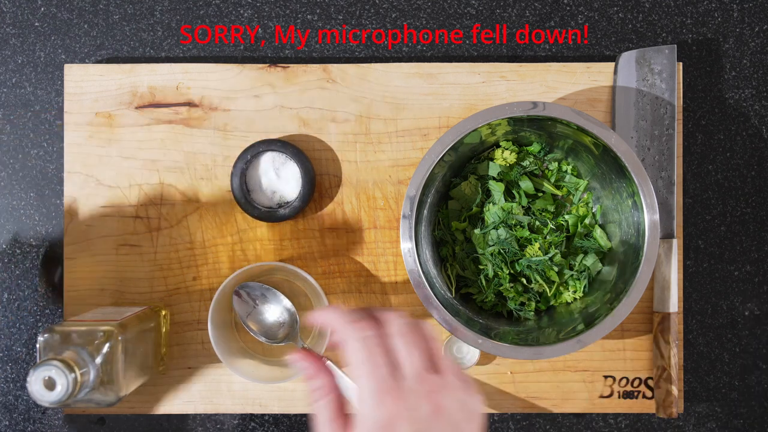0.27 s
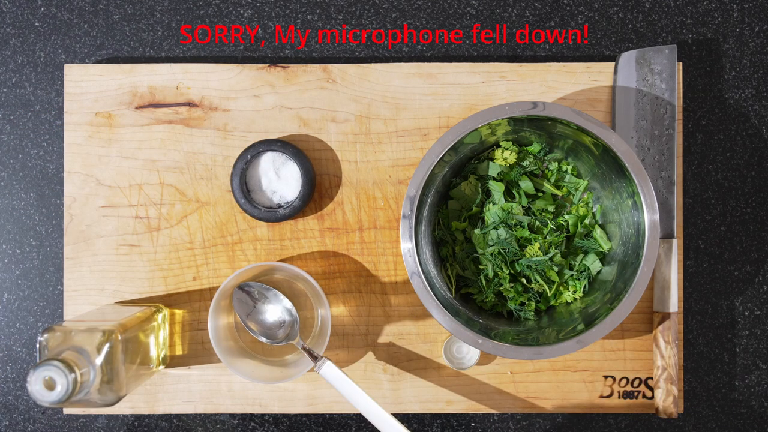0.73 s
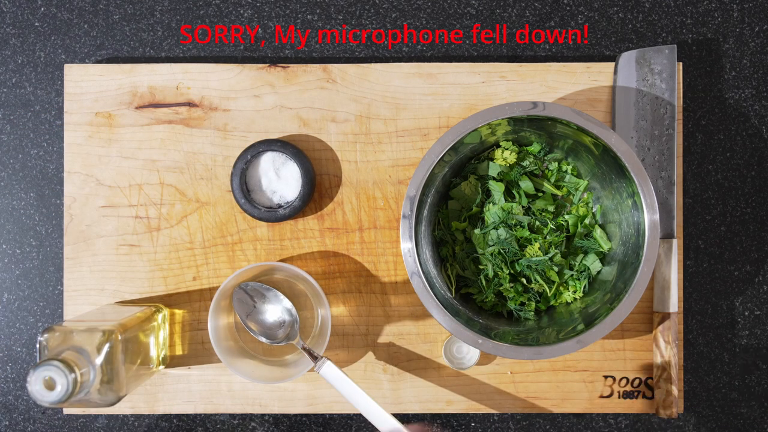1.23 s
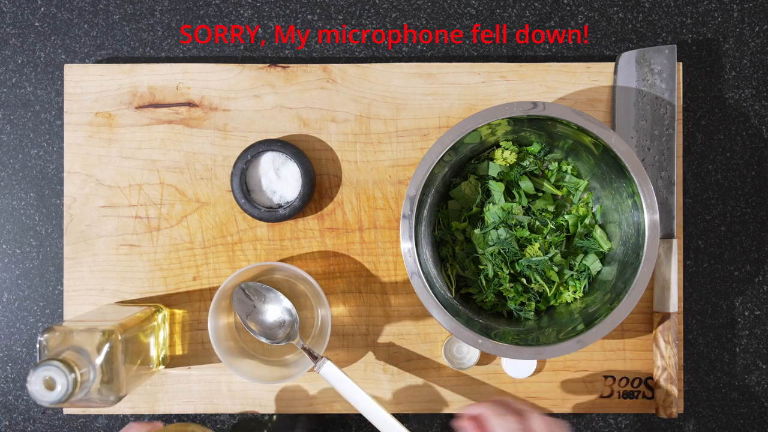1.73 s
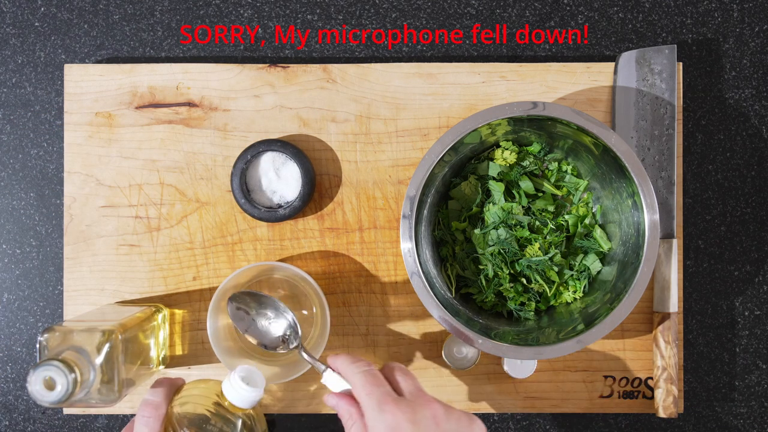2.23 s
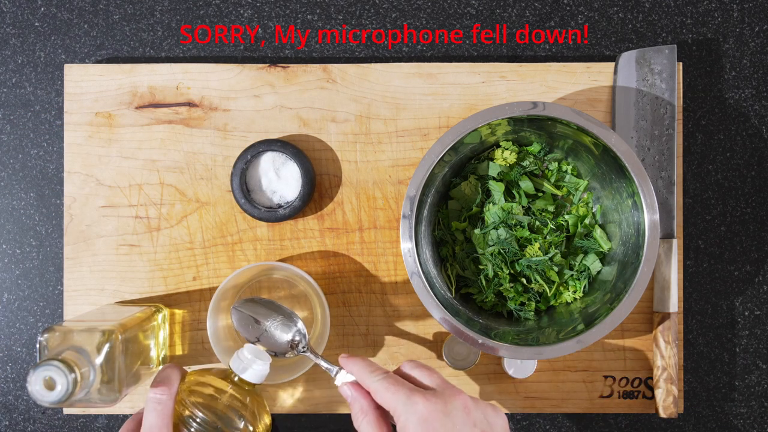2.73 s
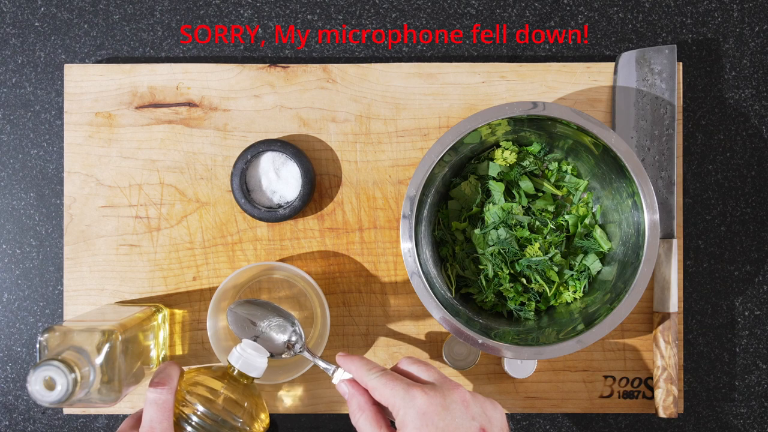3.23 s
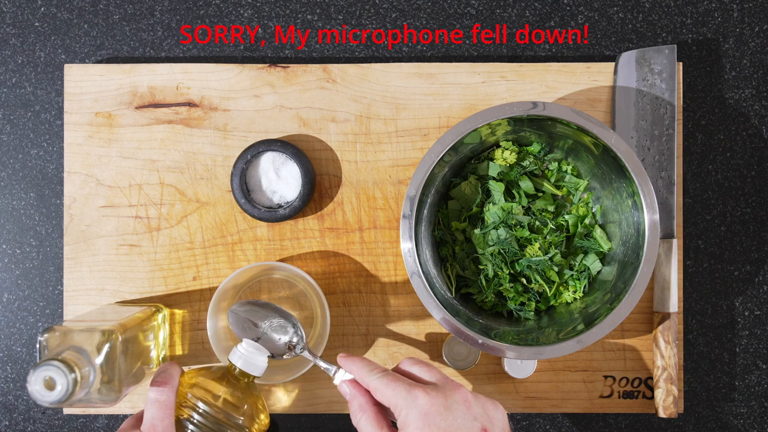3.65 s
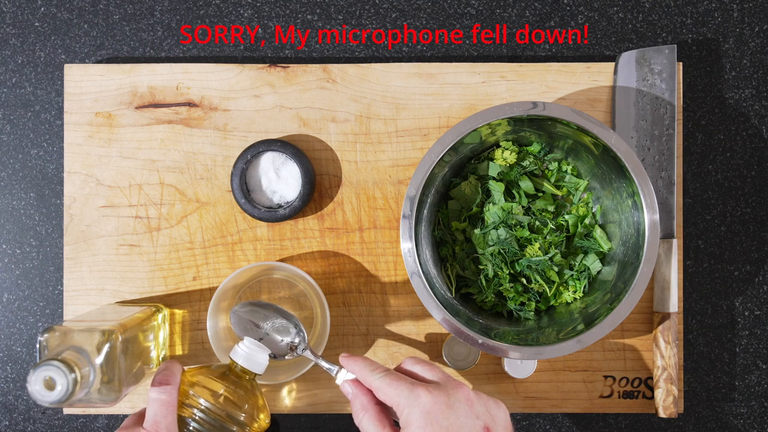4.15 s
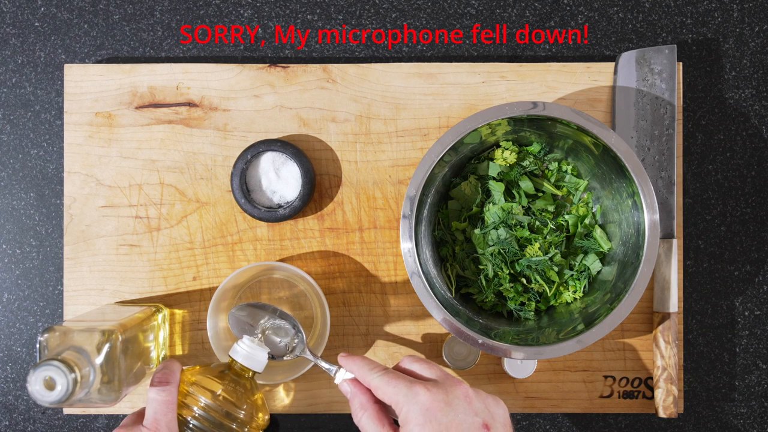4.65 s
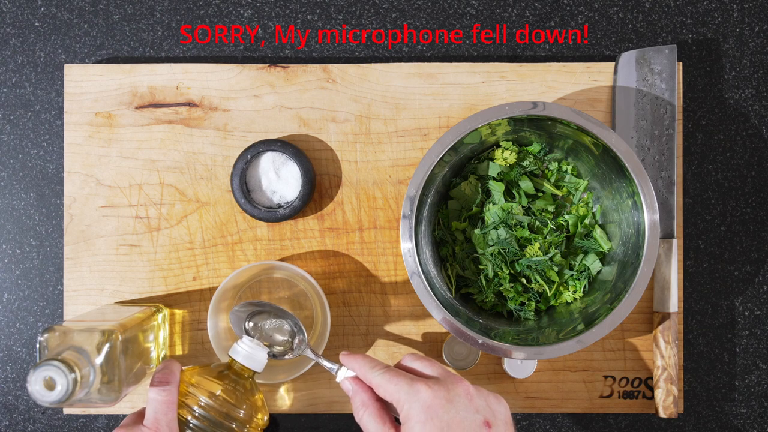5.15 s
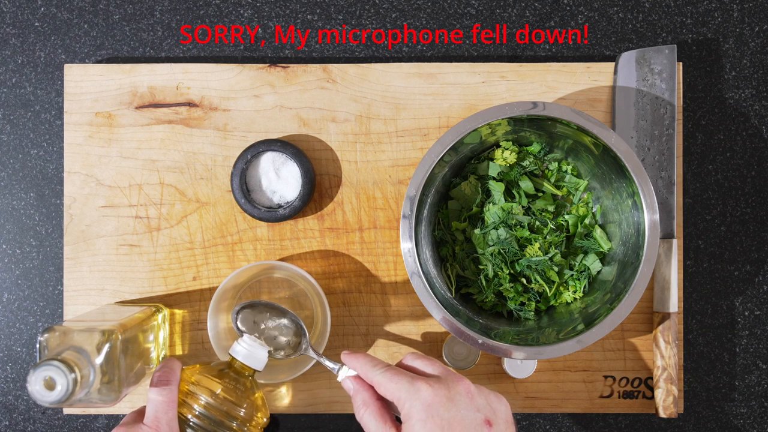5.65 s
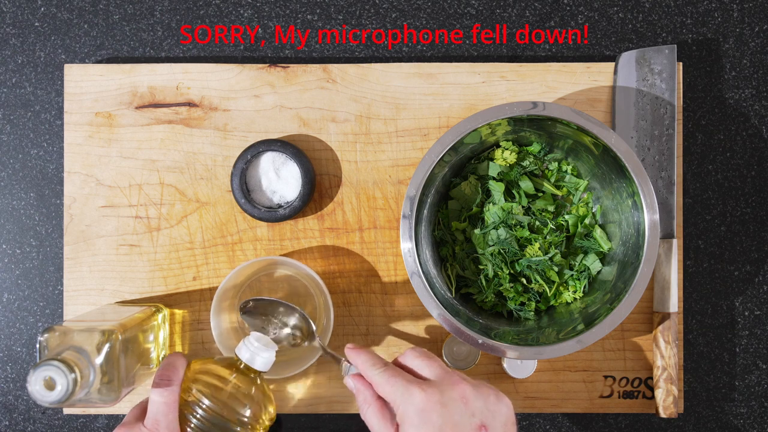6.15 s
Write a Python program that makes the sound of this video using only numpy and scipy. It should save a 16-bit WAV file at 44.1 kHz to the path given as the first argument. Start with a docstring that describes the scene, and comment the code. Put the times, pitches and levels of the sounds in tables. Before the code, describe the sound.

Cloth rustles directly against a small clip-on microphone from the start, with a small snap and, at about 0.2 seconds, a brief rough scrape with low bumps. Softer, uneven rubbing follows, with tiny fold clicks and faint fibre squeaks. At about 1.6 seconds a glass bottle knocks once, sharp and clear, with a short ring and a slight kitchen echo. The rustle swells right afterwards, and just before 2 seconds the fabric scrapes hard across the microphone with low thumps and a loud dry snap. It trails off by about 2.6 seconds. The rest is quiet: soft, steady room air with a faint appliance hum, present throughout. Two faint ticks of a spoon or bottle come at about 3.2 and 5.5 seconds. From about 6.1 seconds a light cloth rustle returns with two small clicks.

```python
"""Cloth rustles right against a small clip-on microphone, over the soft steady air of a quiet kitchen.
The microphone has slipped down against the cook's clothes: folds snap, fibres squeak and swish, and
twice the fabric scrapes hard across the capsule as the cook leans over, bumping its housing.
A glass bottle knocks once, with a short ring and echoes from the worktop and walls.
Later come two faint ticks of a spoon or bottle."""
import sys
import numpy as np
from scipy import signal
from scipy.fft import rfft, irfft, next_fast_len
from scipy.io import wavfile
from scipy.ndimage import uniform_filter1d

SR = 44100
rng = np.random.default_rng(int(sys.argv[2]) if len(sys.argv) > 2 else 0)


def put_to_file(sound):
    """Save the sound as 16-bit audio at rate SR, in the file named by the first command-line argument."""
    columns = np.atleast_2d(sound).T  # one column per channel
    safe = np.clip(columns, -1, 1)
    whole_steps = np.round(safe * 32767)
    wavfile.write(sys.argv[1], SR, whole_steps.astype(np.int16))


N = 281534
T = np.arange(N) / SR

# EQ of the handling rumble through the shell: freq_hz, gain_db
RUMBLE_EQ = [(20, -25), (58, -8), (90, -1.5), (130, 0.5), (240, -2.5), (380, -5), (600, -21.5), (1500, -44),
             (8000, -100)]
# EQ of the dry clicks and the cloth's crackle: freq_hz, gain_db
CLICK_EQ = [(60, -22), (300, 2), (900, 4.5), (3000, 3), (5000, 0), (8000, -19.5), (16000, -36)]


def undb(db):
    """Decibels to gain."""
    return 10 ** (np.asarray(db) / 20)


def unit(x):
    """Scale to rms 1."""
    return x / np.sqrt(np.mean(x ** 2) + 1e-20)


def colour(x, points, tilt_db=0):
    """Minimum-phase EQ through (freq_hz, gain_db) points, tilted by tilt_db per octave above 500 Hz."""
    size = next_fast_len(len(x) + 4096)
    size += size % 2
    octave = np.log2(np.maximum(np.fft.rfftfreq(size, 1 / SR), 1) / 1000)
    hz, db = np.transpose(points)
    gain_db = np.interp(octave, np.log2(hz / 1000), db) + tilt_db * np.maximum(octave, -1)
    # folding the cepstrum keeps the filter from ringing ahead of a hit
    cepstrum = irfft(np.log(undb(gain_db)))
    cepstrum[1:size // 2] *= 2
    cepstrum[size // 2 + 1:] = 0
    return irfft(rfft(x, size) * np.exp(rfft(cepstrum)))[:len(x)]


def add(out, start_s, x):
    """Mix a sound in at a time."""
    i = max(int(start_s * SR), 0)
    out[i:i + len(x)] += x[:max(N - i, 0)]


def wander(rate_hz):
    """Smooth random modulation, rms 1."""
    hold = max(int(SR / rate_hz), 1)
    steps = np.repeat(rng.standard_normal(N // hold + 1), hold)
    return unit(uniform_filter1d(steps, hold)[:N])


def envelope(times, db, fade_s):
    """Gain along a dB curve, fading out beyond its ends."""
    inside_s = np.minimum(T - times[0], times[-1] - T)
    return undb(np.interp(T, times, db)) * np.clip(1 + inside_s / fade_s, 0, 1)


def friction(slips_per_s, spread_db, hiss):
    """Fibres catch and slip: a random train of tiny, unequal clicks over a smooth hiss."""
    slips = (rng.random(N) < slips_per_s / SR) * rng.choice([-1, 1], N)
    sizes = undb(spread_db * np.minimum(rng.exponential(size=N), 4))
    return unit(unit(slips * sizes) + hiss * rng.standard_normal(N))


def housing(x):
    """A touch on the microphone rings its small shell."""
    # resonances of the shell and clip: freq_hz, width_hz, gain_db
    resonances = [(676, 240, -20), (1305, 200, -2.5), (2510, 200, -8), (2910, 260, -1)]
    return x + sum(undb(db) * signal.lfilter(*signal.iirpeak(hz, hz / width, fs=SR), x)
                   for hz, width, db in resonances)


def room_tone(air_db=-59, waver_db=2.5, drift_rad=0.58):
    """A steady bed of air with the faint, wavering hum of a kitchen appliance."""
    # EQ of the air: freq_hz, gain_db
    air_eq = [(20, -18), (45, -7), (90, -7.5), (160, -1.5), (260, -3.5), (420, -2), (700, -3.5),
              (1000, -2.5), (1500, -6), (1750, -10), (3000, -13), (5500, -17.5), (9000, -26.5),
              (15800, -34.5)]
    # partials of the hum: pitch_hz, level_db
    partials = [(349.9, -75.5), (462.8, -72.5), (857, -91), (1561.5, -81)]
    air = unit(colour(rng.standard_normal(N), air_eq)) * undb(air_db + 0.36 * wander(4.67))
    hum = 0
    for hz, db in partials:
        amplitude = np.sqrt(2) * undb(db + waver_db * wander(3.11))
        hum += amplitude * np.sin(2 * np.pi * hz * T + drift_rad * wander(1.964))
    return air + hum


def cloth_rustle(gather_db=-8, ease_db=-7, crackle_db=-14.5):
    """Loose cloth slides in uneven pulls, hisses along its weave, crackles and shakes the housing."""
    # pulls of the cloth: start_s, peak_s, end_s, level_db, relative_hiss_db, relative_rumble_db
    pulls = [(0, 0.064, 0.1, -47, -2.5, 0.5), (0.089, 0.187, 0.21, -39.5, -4, 4),
             (0.22, .275, 0.31, -45, -6.5, -3.5), (0.274, 0.313, 0.62, -53.5, -2.5, -1),
             (0.634, 0.66, 1.25, -58.5, -5.5, -2), (.93, 1.04, 1.106, -50, -14, -0.5),
             (1.153, 1.185, 1.24, -55.5, -1.5, -6), (1.236, 1.298, 1.37, -52, -4.5, -5),
             (1.38, 1.472, 1.5, -60, -5, 0), (1.502, 1.55, 1.63, -49.5, -5, -1),
             (1.657, 1.75, 2.07, -47, -4, -4.5), (1.79, 1.898, 1.93, -38, -8.5, -5),
             (2.002, 2.02, 2.065, -45.5, -8.5, 3.5), (2.088, 2.1, 2.235, -43, -9, 1.5),
             (2.21, 2.27, 2.463, -49.5, -2.5, -3.5), (2.4, 2.424, 2.65, -57.5, -6, -1.5),
             (3.19, 3.31, 3.37, -63, -6, 0.5), (6.108, 6.256, 6.45, -55.5, -10, 1),
             (6.338, 6.36, 6.47, -49, -6, 1)]
    # EQ of the rustle's body: freq_hz, gain_db
    body_eq = [(100, -32), (250, 1), (450, -1), (600, -1), (830, 0), (1100, -3.5), (1400, -4.5),
               (1900, -11), (2600, -20), (5000, -49), (12000, -87)]
    # EQ of the hiss along the weave: freq_hz, gain_db
    hiss_eq = [(900, -26.5), (1600, -0.5), (2100, 0.5), (3000, 0), (3700, -2.5), (5000, -7.5), (7000, -14),
               (10000, -20), (13000, -29), (16000, -34.5)]
    body_gain, hiss_gain, rumble_gain = 0, 0, 0
    for start, peak, end, db, hiss_db, rumble_db in pulls:
        times = np.sort([start, peak, end])
        swell_db = db + np.array([gather_db, 0, ease_db])
        pull = envelope(times, swell_db, fade_s=0.01)
        body_gain = np.hypot(body_gain, pull)  # overlapping pulls add in power
        hiss_gain = np.hypot(hiss_gain, envelope(times, swell_db + hiss_db, fade_s=0.025))
        rumble_gain = np.hypot(rumble_gain, pull * undb(rumble_db))
    flutter = undb(1.57 * wander(90))
    body = unit(flutter * colour(friction(slips_per_s=2000, spread_db=4, hiss=0.78), body_eq))
    hiss = unit(flutter * colour(friction(slips_per_s=5200, spread_db=5, hiss=1.9), hiss_eq))
    rumble = unit(flutter * colour(rng.standard_normal(N), RUMBLE_EQ))
    small_folds = housing(friction(slips_per_s=36, spread_db=3, hiss=0))
    crackle = undb(crackle_db) * unit(colour(small_folds, CLICK_EQ, tilt_db=-6.5))
    return body_gain * (body + crackle) + hiss_gain * hiss + rumble_gain * rumble


def dry_clicks():
    """Short dry clicks: cloth folds snapping, and two faint ticks of a spoon or bottle."""
    # fold snaps, and the ticks at 3.21 and 5.522 s: start_s, peak_db, tilt_db_per_octave
    clicks = [(0.0617, -22, -1.5), (.2855, -33, 7.5), (0.9254, -35.5, -4), (1.0133, -35, -4),
              (1.458, -36, -7.5), (1.512, -33.5, 1), (1.82, -19, -8.5), (1.96, -2, 1.5),
              (2.0952, -25, -9.5), (2.139, -30, 1), (2.182, -28.5, 1), (3.21, -39.5, 0), (5.522, -39, -6),
              (6.16, -38, -2.5), (6.342, -36, -4)]
    out = np.zeros(N)
    impulse = housing(signal.unit_impulse(SR // 20))
    for start, db, tilt_db in clicks:
        click = colour(impulse, CLICK_EQ, tilt_db)
        add(out, start, undb(db) * click / np.abs(click).max())
    return out


def housing_bumps():
    """A soft push swings the housing for a few low cycles."""
    # thumps on the housing and cable: start_s, level_db, pitch_hz, attack_cycles
    bumps = [(0.084, -29.5, 162, 0.44), (.199, -21.5, 473, 1.4), (.214, -21.5, 255, 1.5),
             (.267, -22, 190, 0.17), (.67, -44.5, 170, 0.85), (.815, -47, 85, .7), (1.034, -43, 132, 0.83),
             (1.313, -40, 109, 0.63), (1.549, -36, 142, 0.81), (1.821, -28, 123, 0.4),
             (1.903, -20.5, 132, 0.67), (1.922, -15, 193, 0.33), (1.93, -24, 61, 0.96),
             (1.997, -14, 194, 0.48), (2.232, -38, 156, 1.7)]
    out, t = np.zeros(N), T[:SR // 10]
    for start, db, hz, attack_cycles in bumps:
        age = t * hz / attack_cycles
        swell = (age * np.exp(1 - age)) ** 2
        add(out, start, -undb(db) * swell * np.sin(2 * np.pi * hz * t))
    return out


def capsule_scrapes(grip_db=-5.5, slack_db=-11, peak_share=0.41):
    """Cloth grips the capsule and slackens: harsh friction on top, rumble through the shell below."""
    # drags over the capsule: start_s, length_s, level_db, relative_rumble_db, tilt_db_per_octave
    drags = [(0.196, 0.033, -31.5, 2.5, -2.5), (.231, .031, -30.5, -15, 1.5), (0.271, 0.021, -41.5, 2, 0),
             (1.927, .021, -21, 1, 2), (1.944, .024, -15, -12.5, 1.5), (1.973, 0.048, -25, -1.5, 2)]
    # EQ of the rasp: freq_hz, gain_db
    rasp_eq = [(200, -11), (400, 7), (700, 3.5), (1000, 2), (1550, -5), (2000, -2.5), (2900, -6),
               (3600, -11.5), (5000, -15), (7500, -26.5), (11000, -37), (16000, -45)]
    slips = housing(friction(slips_per_s=6000, spread_db=2.5, hiss=0.92))
    rumble = colour(rng.standard_normal(N), RUMBLE_EQ)
    out = np.zeros(N)
    for start, length, db, rumble_db, tilt_db in drags:
        times = start + length * np.array([0, peak_share, 1])
        pressure = envelope(times, [db + grip_db, db, db + slack_db], fade_s=0.0026)
        touching = pressure > 0
        rasp = unit(colour(slips[touching], rasp_eq, tilt_db))
        out[touching] += pressure[touching] * (rasp + undb(rumble_db) * unit(rumble[touching]))
    return out


def squeaks_and_swish():
    """Thin, brief squeaks of fibres slipping almost regularly, and one soft high swish of cloth."""
    # squeaks, and the swish at 2.21 s: start_s, end_s, centre_hz, filter_width_hz, level_db
    rubs = [(.205, 0.23, 10800, 400, -67), (.2, .218, 12050, 450, -66.5), (.94, 0.96, 2700, 840, -59.5),
            (1.03, 1.064, 1870, 759.3, -58), (1.28, 1.3, 2570, 1400, -57), (2.21, 2.242, 8700, 5500, -64)]
    out = np.zeros(N)
    for start, end, hz, width, db in rubs:
        band = signal.iirpeak(hz, hz / width, fs=SR)
        rub = signal.lfilter(*band, signal.lfilter(*band, rng.standard_normal(N)))
        out += unit(rub) * envelope([start, end], [db, db], fade_s=0.022)
    return out


def bottle_knock(start_s=1.62, gain_db=-3.5, attack_s=0.00018,
                 reverb_db=-19, reverb_t60_s=0.43, predelay_s=0.013):
    """One knock rings the glass; near surfaces slap it back and the kitchen holds a faint tail."""
    # modes of the hand-damped bottle: pitch_hz, relative_db, t60_s
    glass_modes = [(2250, -20.5, .004), (2737, -18, .013), (2710, -52, .3), (2790, -51, .35),
                   (3410, -11, .0064), (3980, 1, .00301), (4630, 0, .0105), (4690, -49, .55),
                   (6900, -12.5, .013), (9500, -20, .011)]
    # EQ of the blow, whose contact time rounds off the top: freq_hz, gain_db
    contact_eq = [(200, 8), (1300, 1.5), (2300, 4), (4700, -0.5), (5200, -22), (6200, -16.5), (9500, -21),
                  (16000, -23)]
    # early reflections: delay_s, gain_db
    echoes = [(.0082, -13.5), (0.0106, -13)]
    out, t = np.zeros(N), T[:SR // 2]
    modes = sum(undb(db - 60 * t / t60) * np.sin(2 * np.pi * hz * t) for hz, db, t60 in glass_modes)
    attack = 1 - np.exp(-t / attack_s)  # the bending wave runs round the bottle's wall
    ring = colour(modes * attack, contact_eq) * undb(gain_db)
    add(out, start_s, ring)
    # the lower modes radiate more widely, so reflections are duller
    dull_ring = colour(ring, [(300, -1), (1500, 9.5), (2800, -2), (4600, -7), (9000, -1)])
    for delay, db in echoes:
        add(out, start_s + delay, undb(db) * dull_ring)
    walls = rng.standard_normal(len(t)) * undb(-60 * t / reverb_t60_s)
    tail = signal.fftconvolve(dull_ring, walls / np.linalg.norm(walls))
    add(out, start_s + predelay_s, undb(reverb_db) * tail)
    return out


def scene():
    """Everything meets in mono at the one microphone."""
    bed = room_tone()
    clothing = cloth_rustle() + squeaks_and_swish() + capsule_scrapes() + housing_bumps()
    return (bed + clothing + dry_clicks() + bottle_knock())[None]


def record(dry, low_cut_hz=25, high_cut_hz=15750):
    """A gentle low cut drops the deepest rumble; a steep high cut trims the top."""
    low_cut = signal.butter(2, low_cut_hz, "high", fs=SR, output="sos")
    high_cut = signal.ellip(10, 0.1, 70, high_cut_hz, fs=SR, output="sos")
    return signal.sosfilt(high_cut, signal.sosfilt(low_cut, dry))


dry = scene()
out = record(dry)
put_to_file(out)
```